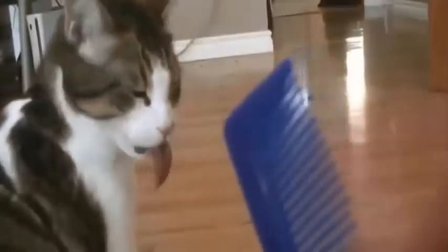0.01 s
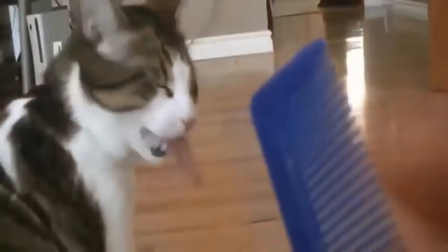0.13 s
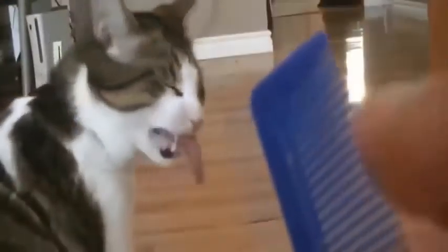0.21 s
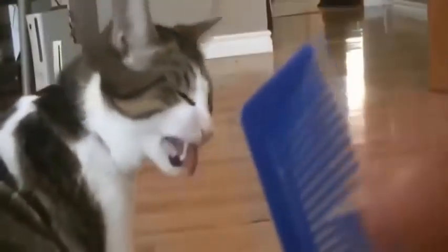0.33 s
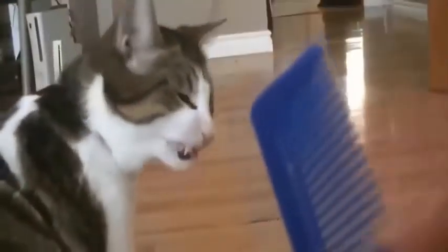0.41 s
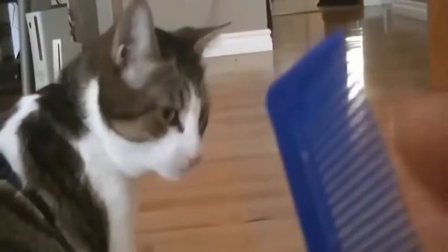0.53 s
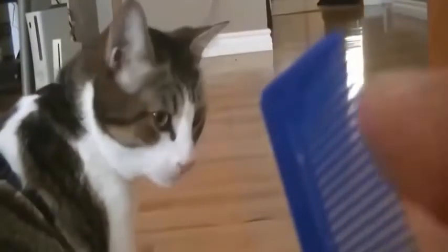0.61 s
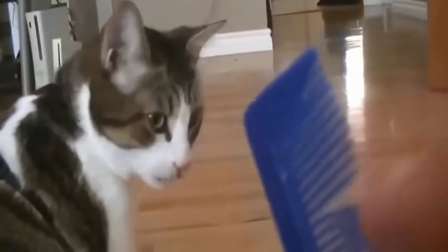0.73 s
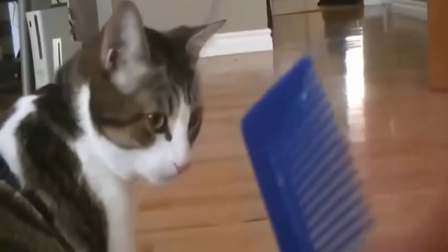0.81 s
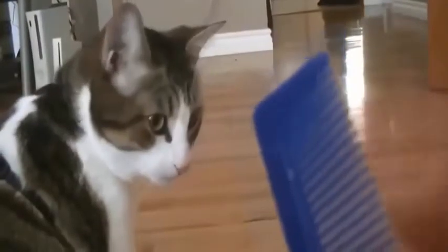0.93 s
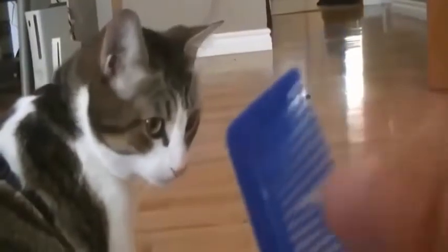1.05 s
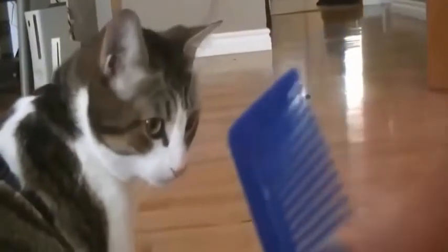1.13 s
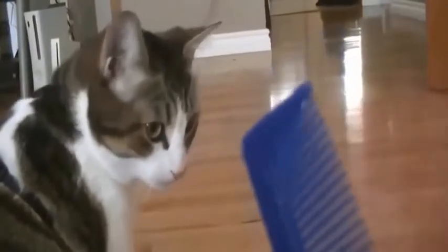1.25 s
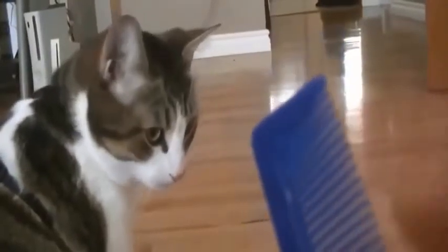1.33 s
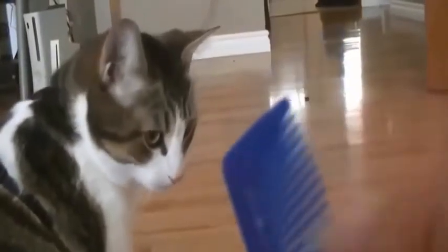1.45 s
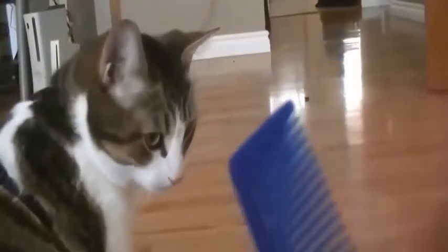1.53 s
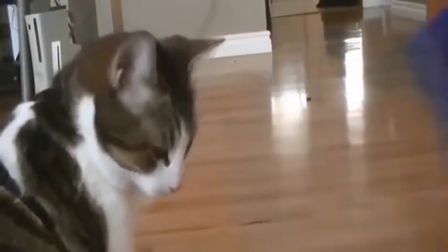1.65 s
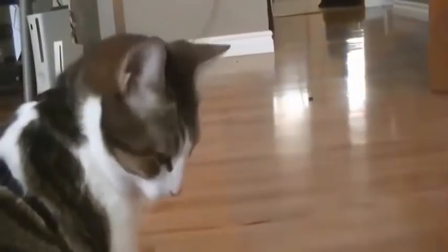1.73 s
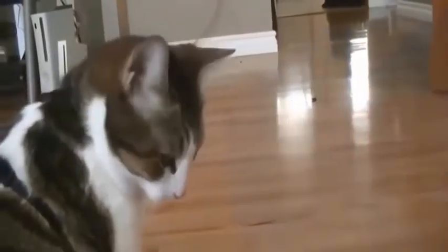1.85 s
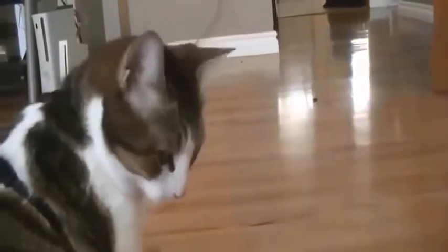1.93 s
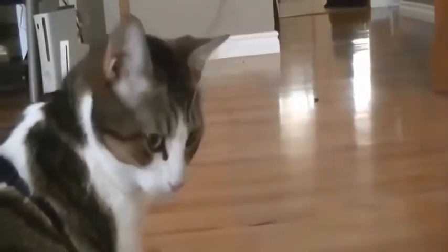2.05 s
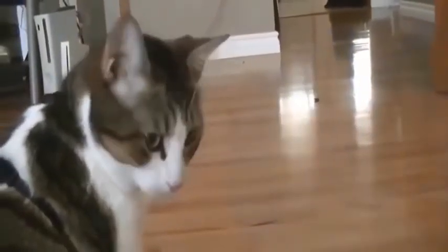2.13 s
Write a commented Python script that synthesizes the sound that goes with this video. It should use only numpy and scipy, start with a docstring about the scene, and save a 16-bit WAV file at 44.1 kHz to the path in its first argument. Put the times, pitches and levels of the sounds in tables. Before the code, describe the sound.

Close by in a quiet room, a thumb strums a plastic comb five times, at about 0.23, 0.63, 1.03, 1.42 and 1.8 seconds. Each burst lasts under 0.2 seconds: roughly ten rapid, hard clicks with a short plasticky ring near 2 kHz and grainy skin rasp. Faint rubbing falls between; a soft swish comes near 2.1 seconds, over low hiss and slight hum.

```python
"""A thumb runs five times along the teeth of a plastic pocket comb, close by, in a quiet room.
Each tooth slips and snaps free: filtered clicks and crackle excite the comb's resonances.
A short sine with a rising pitch near 2 kHz is the tooth's own ring; grainy noise is skin rasping on the tips.
Coloured noise gives the faint rubbing of the hand, the soft swish as it moves off at the end, and the room's
hiss, under which lies a wavering hum."""
import sys
import numpy as np
from scipy import signal
from scipy.fft import rfft, irfft
from scipy.io import wavfile

SR = 44100
rng = np.random.default_rng(int(sys.argv[2]) if len(sys.argv) > 2 else 0)


def dump(signal):
    """Clip the signal to [-1, 1] and save it as 16-bit WAV at the path in sys.argv[1]."""
    limited = np.clip(np.atleast_2d(signal).T, -1, 1)
    pcm = np.round(limited * 32767).astype(np.int16)
    wavfile.write(sys.argv[1], SR, pcm)


N = 97020
T = np.arange(N) / SR

# teeth snapping free: t/s, relative snap level/dB, relative treble/dB, nominal ring f/Hz, relative ring level/dB
TOOTH_SNAPS = [(0.23, 1.5, -4.5, 1968, 0), (0.2482, 3.5, -3, 2280, 7), (0.265, 8, -10, 2292, 13.5),
               (0.2819, 7, 2.5, 2120, 14), (0.2982, 7.5, 0.5, 2156, 13.5), (0.311, 5.5, -3.5, 2095, 8.5),
               (0.324, 1, 5.5, 2047, 10), (0.342, 4.5, -12, 2086, 13.5), (0.3468, -1.5, -16.5, 2001, 12),
               (0.3752, -1.5, -26, 1938, 11), (0.4246, -24.5, -32, 1860, -18), (0.6326, 2, -12.5, 2312, 8),
               (0.6535, 3.5, -2.5, 2184, 3.5), (0.6724, 7, -5.5, 2130, 8), (0.6894, 6, -1, 2026, 7.5),
               (0.709, 7, -1, 2042, 13), (0.725, 3.6, -2, 2100, 8.5), (0.7433, 5, -2.5, 1994, 13.5),
               (0.7653, 2.0, -6.5, 1988, 15), (0.821, -23.5, -16.5, 1700, -23),
               (1.0202, -6.5, -12.5, 1760, -2.5), (1.0438, -2, -17, 2317, 7), (1.07, 4, -3, 2210, 6),
               (1.0911, 8, 0.5, 2125, 11), (1.109, 10, -3.5, 2206, 16.5), (1.125, 5, 1.5, 1940, 11.5),
               (1.138, 4, -1, 2063, 9.5), (1.1507, 2, -14, 2050, 10.5), (1.161, 2, -3, 1984, 14),
               (1.1823, 0, -8.5, 1941, 11.5), (1.2103, -12.5, -31.5, 1904, 4),
               (1.4181, -3.5, -9.5, 2336, 8), (1.4359, 0.5, -9, 2130, 8.5), (1.4539, 5, -2, 2218, 12.5),
               (1.4697, 7, -3.5, 2167, 14), (1.4851, 4.5, 3.5, 2195, 11.5), (1.5002, 6, 0, 2010, 11.5),
               (1.5144, 3, 1, 2070, 12), (1.524, 2, -4.5, 2086, 12.5), (1.5399, 3, -4.5, 1980, 12.5),
               (1.5569, 1.5, -15, 1978, 14.5), (1.5831, 1.5, -3, 1871, 12), (1.6076, -15.5, -24.5, 1821, 0),
               (1.8058, -3.5, -10.5, 2254, 3.5), (1.8141, -1, -23.5, 2137, 6.5),
               (1.8303, 0.76, -21.5, 2150, 7.5), (1.8457, 7, -8.5, 2165, 9.5), (1.8601, 7, -4, 2044, 12.5),
               (1.8745, 7, -1.5, 2113, 15), (1.8889, 1.5, 2, 2054, 15.5), (1.8976, 0.86, -25, 2084, 9),
               (1.9052, -1.5, -25, 2122, 5)]
# strokes of the thumb: start t/s, end t/s, base rasp level/dB
THUMB_STROKES = [(0.225, 0.384, -43), (0.625, 0.784, -46), (1.041, 1.184, -45.5), (1.407, 1.592, -44),
                 (1.802, 1.929, -46)]


def from_db(db):
    """Decibels to gain."""
    return 10 ** (np.asarray(db) / 20)


def rms_one(x):
    """Scale to unit rms."""
    return x / np.sqrt(np.mean(x ** 2) + 1e-20)


def butter(x, hz, kind, order=2):
    """Plain low- or high-pass."""
    sos = signal.butter(order, min(hz, .45 * SR), kind, fs=SR, output="sos")
    return signal.sosfilt(sos, x)


def resonator_poles(hz, width_hz):
    """Pole radius and denominator of a two-pole resonance."""
    r = np.exp(-np.pi * width_hz / SR)
    return r, [1, -2 * r * np.cos(2 * np.pi * hz / SR), r * r]


def resonate(x, hz, width_hz):
    """A resonance with gain 1 at its top."""
    r, poles = resonator_poles(hz, width_hz)
    return signal.lfilter(np.array([1, 0, -1]) * (1 - r * r) / 2, poles, x)


def noise(colour):
    """Steady noise of the given colour, rms 1."""
    hz, db = np.transpose(colour)
    log_hz = np.log(np.fft.rfftfreq(N, 1 / SR) + 1)
    gain = from_db(np.interp(log_hz, np.log(hz), db))
    return rms_one(irfft(rfft(rng.standard_normal(N)) * gain, N))


def room_tone():
    """Quiet hiss, with a hum that wavers because it is noise through two narrow resonances."""
    # colour of the hiss: f/Hz, relative level per Hz/dB
    air_colour = [(65, -48.5), (110, -16.5), (233, -8.5), (353, -9.5), (830, -9), (1020, -17), (1430, -11),
                  (1550, -29), (2080, -12.5), (3420, -19.5), (6010, -31), (11500, -24), (16000, -28)]
    hiss_db, hum_db = -59.5, -70
    hum_hz, hum_width_hz = 235.57, 16
    hum = rng.standard_normal(N + SR)
    for _ in range(2):
        hum = resonate(hum, hum_hz, hum_width_hz)
    hum = hum[SR:]  # drop the second in which the resonances build up
    return from_db(hiss_db) * noise(air_colour) + from_db(hum_db) * rms_one(hum)


def hand_rubbing():
    """Soft friction of the hand: coloured noise that rises briefly now and then."""
    # level of the rubbing: t/s, level/dB
    rubbing_level = [(0, -55), (.03, -58), (.057, -45), (.075, -63.5), (.42, -58.5), (.445, -51),
                     (.47, -65.5), (.76, -52.5), (.82, -55), (.86, -60), (1.58, -60.5), (1.612, -48.5),
                     (1.66, -60.5)]
    # colour of the rubbing: f/Hz, relative level per Hz/dB
    rubbing_colour = [(300, -13), (1350, -6.5), (1720, 6.5), (2200, -5), (3400, -2.5), (6000, -2),
                      (9000, -10), (15000, -24.5)]
    return from_db(np.interp(T, *np.transpose(rubbing_level))) * noise(rubbing_colour)


def rasp():
    """Skin drags grainily over the tips: louder where the thumb presses harder, swelling towards each snap."""
    # colour of the skin on the tips: f/Hz, relative level per Hz/dB
    skin_colour = [(150, -4), (700, -12), (1050, 0), (1400, -2), (2100, 2.5), (3300, -0.5), (4200, -6),
                   (5600, -4), (9000, -8), (15000, -11.5)]
    follow_share, swell_db = 0.738, 4.5  # share of the snaps' level in dB; rise from one tooth to the next
    arch_db = 7  # drop from mid-stroke, where pressure peaks, to either end
    grain_cutoff_hz, grain_db = 870, 3  # speed limit and rms depth of the level flicker
    times, snap_db, *_ = np.transpose(TOOTH_SNAPS)
    across_tooth = np.interp(T, times, np.arange(len(times))) % 1
    pressure_db = follow_share * np.interp(T, times, snap_db) + swell_db * across_tooth
    level = 0
    for start, end, db in THUMB_STROKES:
        off_centre = np.abs(2 * (T - start) / (end - start) - 1)
        stroke_db = db + pressure_db - arch_db * np.minimum(off_centre, 1) ** 2
        level = level + (off_centre < 1) * from_db(stroke_db)
    grain = rms_one(butter(rng.standard_normal(N), grain_cutoff_hz, "low"))
    return level * rms_one(noise(skin_colour) * from_db(grain_db * grain))


def progress(s):
    """How far along the nearest stroke the thumb is, 0-1."""
    start, end, _ = min(THUMB_STROKES, key=lambda row: abs((row[0] + row[1]) / 2 - s))
    return np.clip((s - start) / (end - start), 0, 1)


def modes(force, table, along):
    """The comb's resonances, coloured by where the thumb is and a little by chance."""
    scatter_db, detune = 1, 0.0246
    out = 0
    for hz, width_hz, *levels in table:
        gain = from_db(np.interp(along, [0, .5, 1], levels) + scatter_db * rng.normal())
        mode_hz = hz * (1 + detune * rng.uniform(-1.4, 1))
        out = out + gain * resonate(force, mode_hz, width_hz)
    return out


def smear(x, count=5):
    """Bending plastic spreads a snap over a fraction of a millisecond: all-passes, scattered for each tooth."""
    low_hz, high_hz, width_hz, scatter = 2700, 12604, 1800, 0.1584
    centres = np.linspace(low_hz, high_hz, count) * (1 + scatter * rng.uniform(-0.638, 1, count))
    for hz in centres:
        _, poles = resonator_poles(hz, width_hz)
        x = signal.lfilter(poles[::-1], poles, x)
    return x


def snap(t, along, treble_db):
    """Crackle builds as the tip slips, the snap strikes the high resonances, the release knocks the low ones."""
    # upper resonances of the comb: f/Hz, width/Hz, relative level/dB at the start, middle and end of a stroke
    spine_modes = [(1514.7, 89, -17.5, -2.5, -6), (2676, 555, -12, 2.5, 6), (3297, 422, 6.5, 3.5, 10),
                   (4827, 567, 4, -7.5, -2), (5505, 412, 5, 0.5, 1.5), (6082, 606, -26, -14.5, 0.5),
                   (6633, 439, 1, -2, -6.5), (8106, 923, 2, -3, -8), (10440, 817, -9.5, -5, -1),
                   (12700, 620, -6, -22, -26), (14480, 2530, -9.5, -14.5, -8.5)]
    # low resonances knocked by the release: f/Hz, width/Hz, relative level/dB at start, middle and end
    knock_modes = [(264, 187, -2.5, -19.5, -14), (654, 378, 6.5, -8.5, -2.5), (1038.1, 113.5, 17, 4.5, -9),
                   (1192, 117, -15.5, 5.5, 10.5)]
    slip_lead_s = 0.00033  # the tip slips just before the tooth swings free
    grit_db, grit_decay_s, grit_low_cut_hz = -9, 0.00283, 4630  # fine crackle of the contact
    treble_from_hz, treble_offset_db, knock_db = 7500, 2, -3
    release = signal.unit_impulse(len(t), np.argmin(np.abs(t)))
    slip = smear(signal.unit_impulse(len(t), np.argmin(np.abs(t + slip_lead_s))))
    grit = rng.standard_normal(len(t)) * np.exp(-np.abs(t + slip_lead_s) / grit_decay_s)
    grit = from_db(grit_db) * grit / np.linalg.norm(grit)
    force = slip + butter(grit, grit_low_cut_hz, "high")
    middle = modes(force, [mode for mode in spine_modes if mode[0] < treble_from_hz], along)
    treble = modes(force, [mode for mode in spine_modes if mode[0] >= treble_from_hz], along)
    knock = modes(release, knock_modes, along)
    return middle + from_db(treble_db + treble_offset_db) * treble + from_db(knock_db) * knock


def tooth_ring(t, along, hz):
    """The freed tooth kicks, then swings for a few milliseconds, rising in pitch until the skin stops it."""
    first_s, last_s, damping = 0.003125, 0.00506, 3.07  # the last teeth of a stroke ring longest
    bend, bend_s = 0.341, 0.00293  # a tooth starts flat and rises as the thumb lets go
    kick_db, kick_s = 12.5, 0.00039  # the first swing is by far the widest
    length_s = first_s + (last_s - first_s) * along ** 2
    age, free = np.maximum(t, 0), t >= 0
    pitch = hz * (1 + bend * (.5 - np.exp(-age / bend_s)))
    width = np.exp(-(age / length_s) ** damping) + from_db(kick_db) * np.exp(-age / kick_s)
    swing = np.cos(2 * np.pi * np.cumsum(pitch * free) / SR) * free * width
    swing = resonate(swing, hz, hz)
    return swing / np.linalg.norm(swing)


def teeth(size=1500, lead_count=100):
    """Every tooth gives a snap through the comb and a ring of its own."""
    delay_s, snap_offset_db, ring_offset_db = .00008, -0.39, -14
    out = np.zeros(N + size)
    t = (np.arange(size) - lead_count) / SR
    for s, snap_db, treble_db, hz, ring_db in TOOTH_SNAPS:
        along = progress(s)
        i = int((s + delay_s) * SR) - lead_count
        out[i:i + size] += from_db(snap_db + snap_offset_db) * snap(t, along, treble_db)
        out[i:i + size] += from_db(ring_db + ring_offset_db) * tooth_ring(t, along, hz)
    return out[:N]


def room(x):
    """A faint, short, dull reverberation: convolution with decaying noise."""
    level_db, t60_s, delay_s, dull_hz = -27.5, 0.265, 0.00057, 8000
    tail = butter(rng.standard_normal(N), dull_hz, "low", order=1)
    tail = tail * (T > delay_s) * np.exp(-np.log(1000) * T / t60_s)
    return from_db(level_db) * signal.fftconvolve(x, tail / np.linalg.norm(tail))[:N]


def swish():
    """The hand moves off: coloured noise that rises fast and fades more slowly."""
    # colour of the swish: f/Hz, relative level per Hz/dB
    swish_colour = [(300, -13), (1100, -5), (1700, -3.5), (3500, -1), (8000, -1.5), (11000, -7),
                    (15000, -19)]
    peak_s, peak_db, rise_db_per_s, fall_db_per_s = 2.0955, -48, 156, 46
    drop_db = np.maximum((peak_s - T) * rise_db_per_s, (T - peak_s) * fall_db_per_s)
    return from_db(peak_db - drop_db) * noise(swish_colour)


def scene():
    """Comb, hand and room with the lows cut, the same in both ears."""
    comb = rasp() + teeth()
    mix = room_tone() + hand_rubbing() + comb + room(comb) + swish()
    mono = butter(mix, 152, "high")
    return np.stack([mono, mono])


def record(dry):
    """The top is cut steeply."""
    cutoff_hz = 15700
    return signal.sosfilt(signal.ellip(10, .2, 80, cutoff_hz, fs=SR, output="sos"), dry)


dry = scene()
out = record(dry)
dump(out)
```